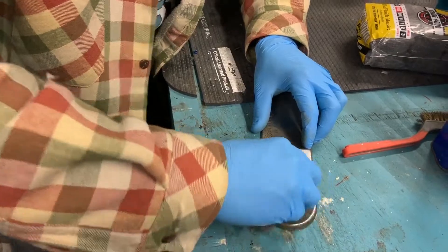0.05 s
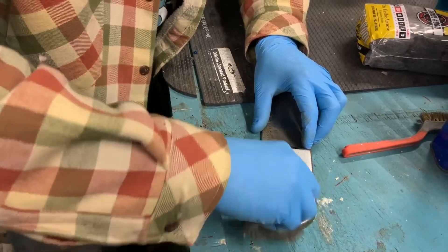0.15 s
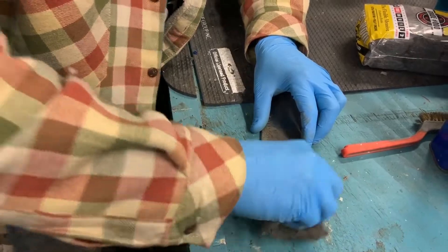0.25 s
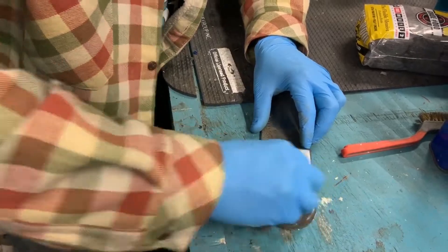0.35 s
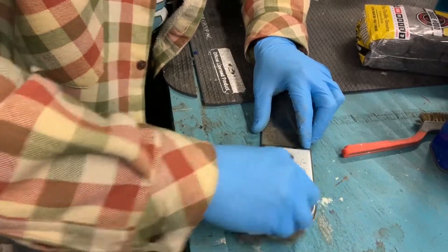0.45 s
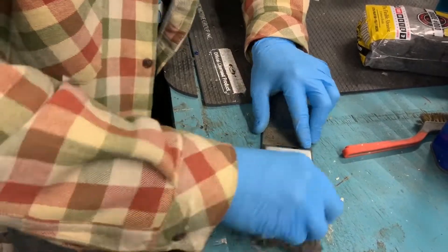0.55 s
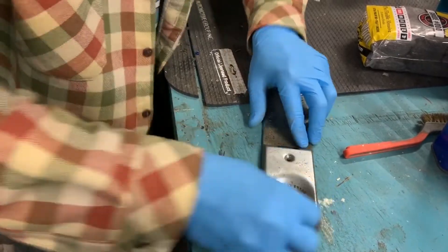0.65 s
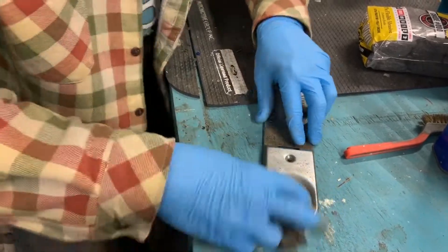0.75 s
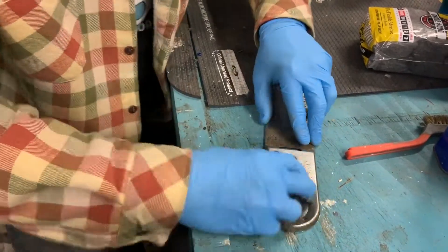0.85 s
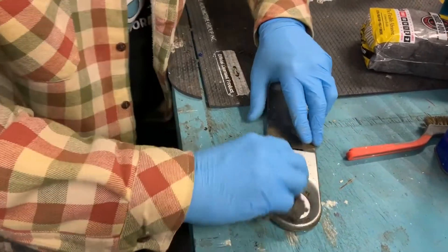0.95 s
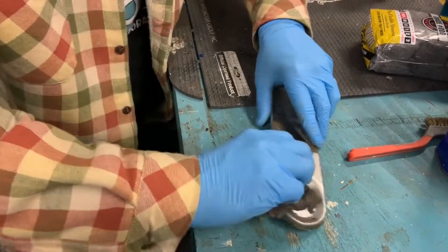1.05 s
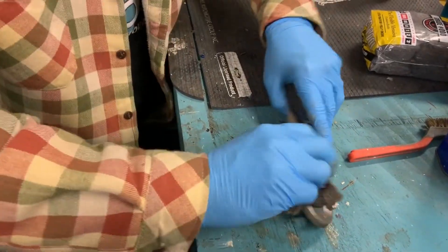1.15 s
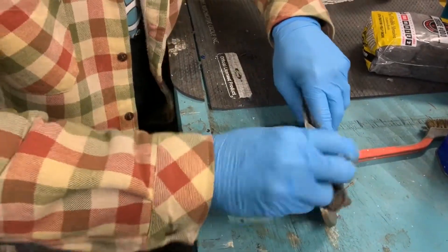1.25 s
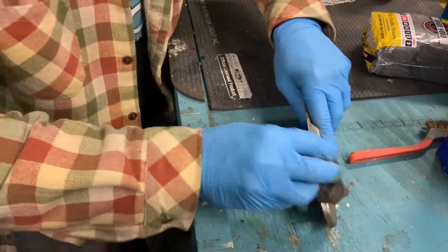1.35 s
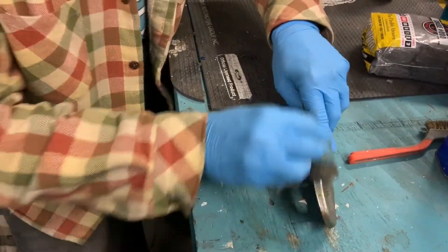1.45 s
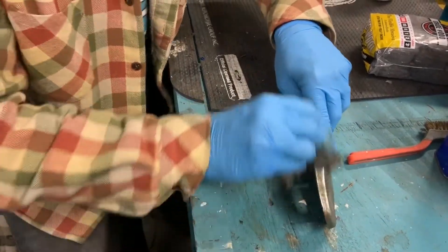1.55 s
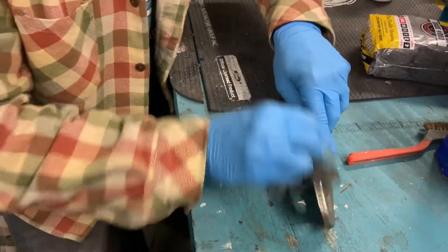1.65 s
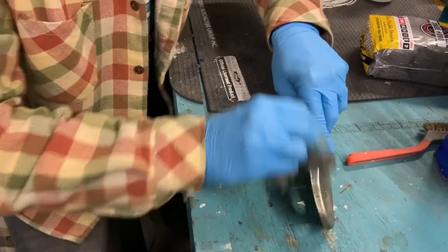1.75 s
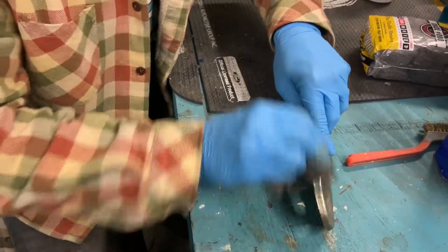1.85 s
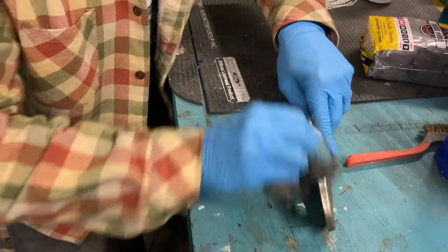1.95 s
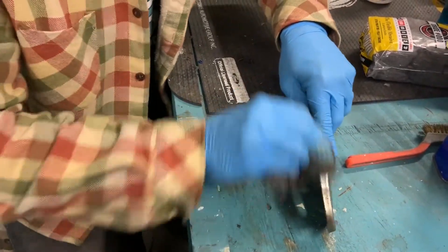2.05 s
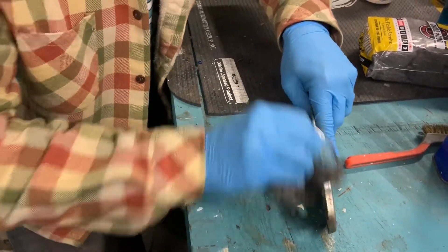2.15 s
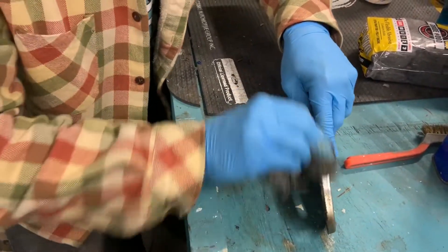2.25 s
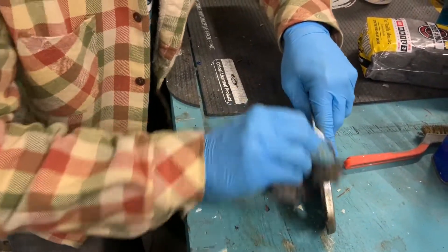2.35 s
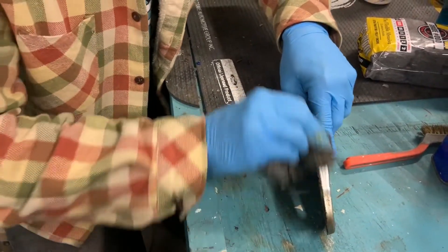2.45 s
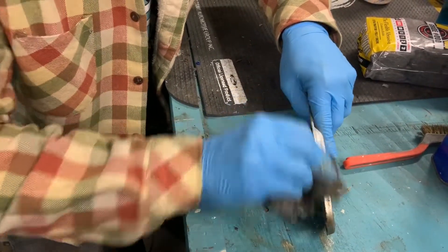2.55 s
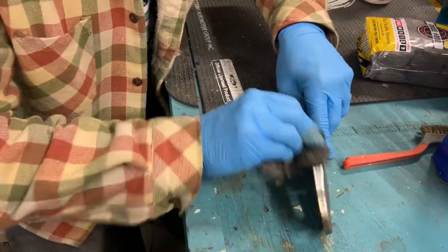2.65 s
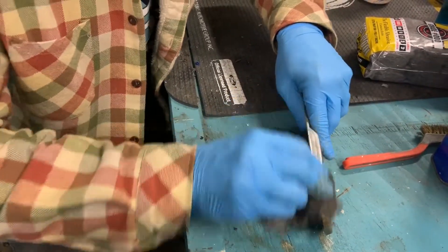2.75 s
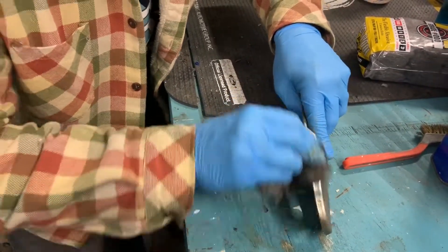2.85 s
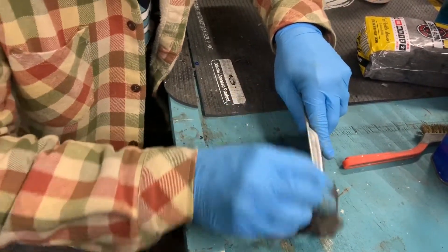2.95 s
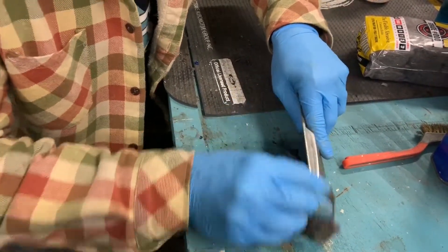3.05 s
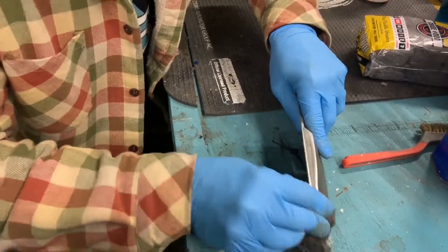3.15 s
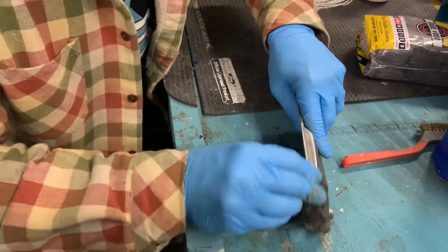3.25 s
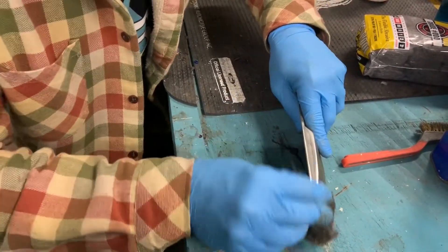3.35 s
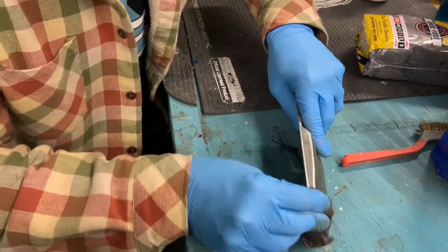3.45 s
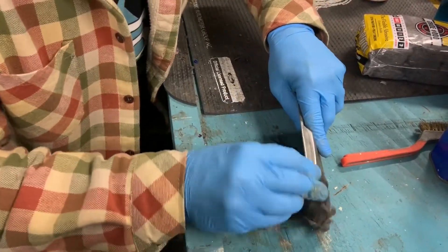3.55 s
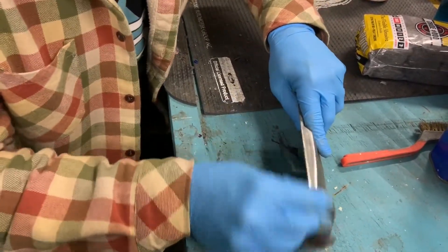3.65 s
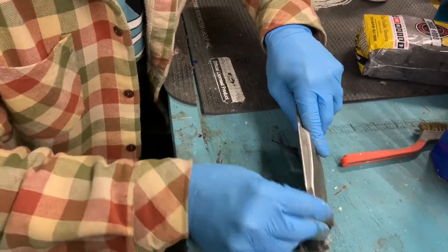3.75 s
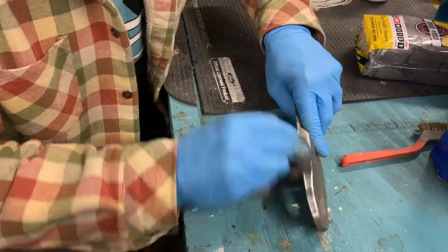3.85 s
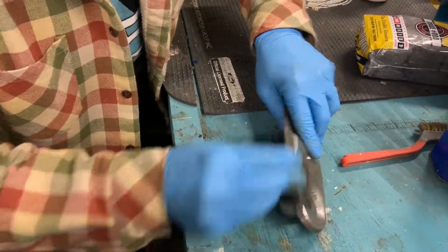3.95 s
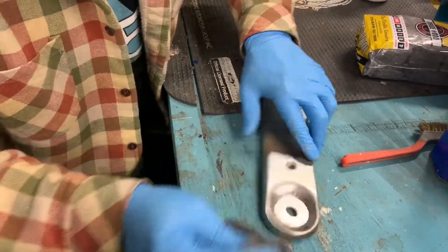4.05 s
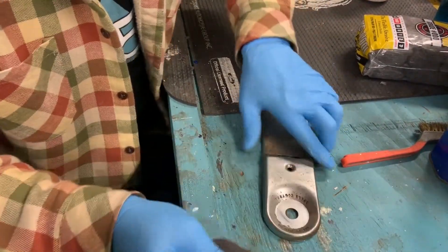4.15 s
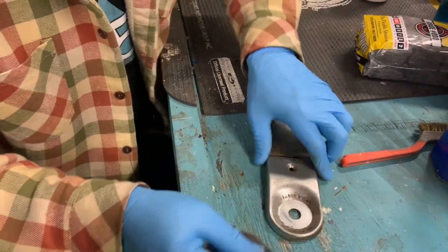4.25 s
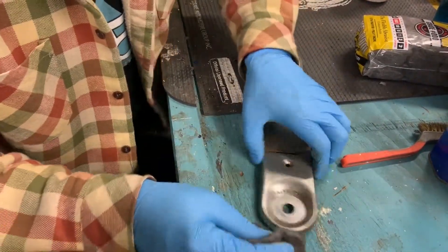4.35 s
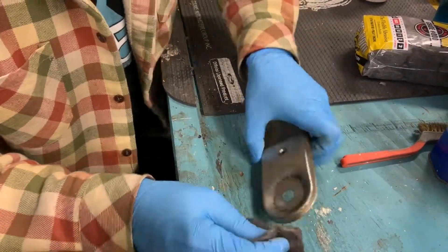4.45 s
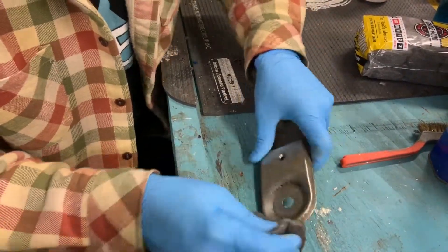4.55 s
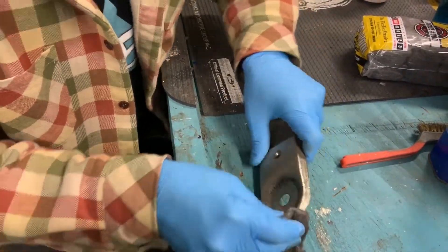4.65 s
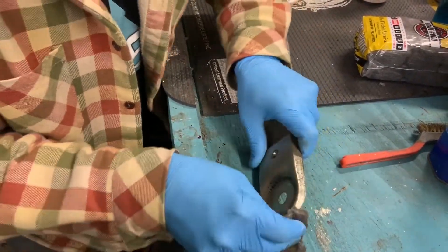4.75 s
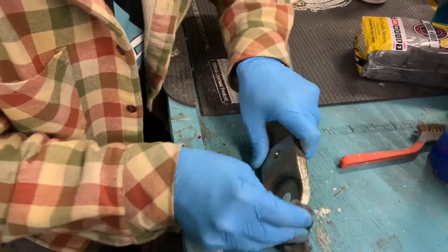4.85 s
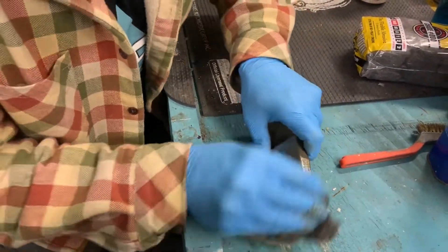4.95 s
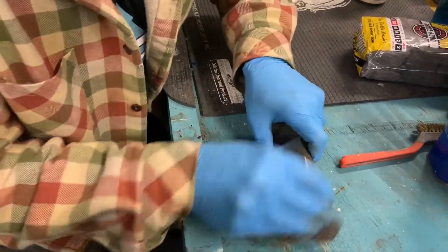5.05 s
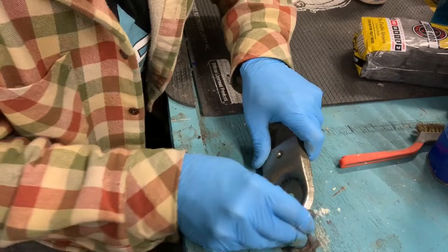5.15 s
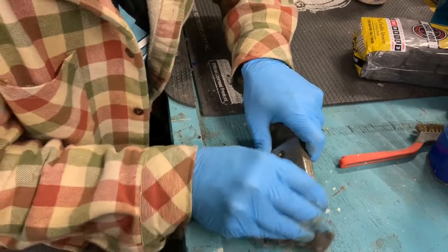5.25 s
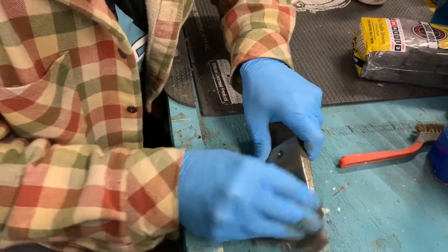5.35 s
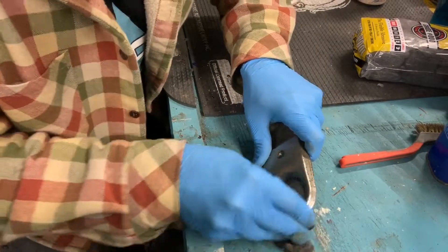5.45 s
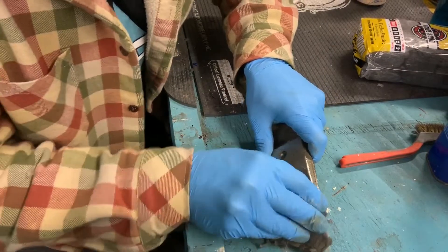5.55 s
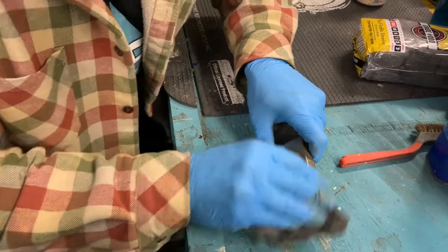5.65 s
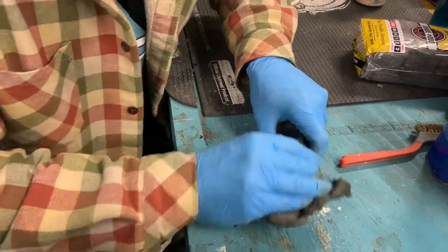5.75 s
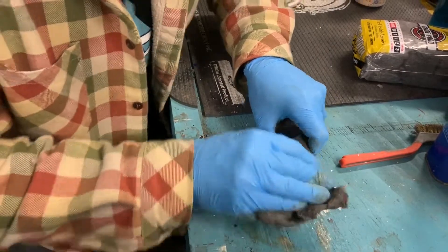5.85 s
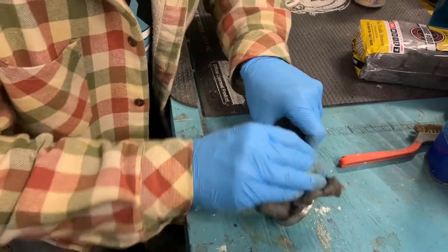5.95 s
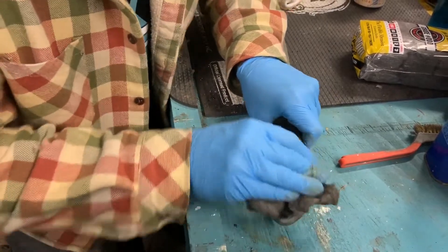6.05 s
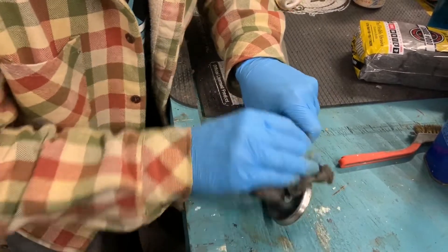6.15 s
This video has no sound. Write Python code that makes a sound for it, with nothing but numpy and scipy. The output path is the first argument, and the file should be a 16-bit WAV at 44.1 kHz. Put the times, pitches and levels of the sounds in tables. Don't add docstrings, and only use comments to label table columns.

```python
import sys
import numpy as np
from scipy import signal
from scipy.fft import rfft, irfft, next_fast_len
from scipy.io import wavfile
from scipy.ndimage import uniform_filter1d, map_coordinates

SR = 44100
rng = np.random.default_rng(int(sys.argv[2]) if len(sys.argv) > 2 else 0)


def invert_db(x):
    u = np.asarray(x, float) / 20
    return 10 ** u


def log_audio(samples):
    frames = np.atleast_2d(samples).T
    limited = np.clip(frames, -1, 1)
    pcm = np.round(limited * 32767).astype(np.int16)
    wavfile.write(sys.argv[1], SR, pcm)


N = 273861
SPLIT_HZ = 7900


def unit(x):
    return x / np.sqrt(np.mean(x ** 2) + 1e-20)


def along(points, hz):
    point_hz, value = np.transpose(points)
    return np.interp(np.log(hz + 1), np.log(point_hz + 1), value)


def curves(rows, **outside):
    time_s, *columns = np.transpose(rows)
    return np.array([np.interp(np.arange(N) / SR, time_s, c, **outside) for c in columns])


def wobble(rate_hz):
    knots = rng.standard_normal(int(N * rate_hz / SR) + 4)
    return map_coordinates(knots, [np.arange(N) * rate_hz / SR])


def swell(start_s, rise_s, t60_s):
    t = np.clip(np.arange(N) / SR - start_s, 0, None)
    return (1 - np.exp(-t / rise_s)) ** 2 * invert_db(-120 * t / t60_s)


def filtered(x, response):
    m = next_fast_len(N + SR // 4)
    return irfft(rfft(x, m) * response(np.fft.rfftfreq(m, 1 / SR)), m)[..., :N]


def resonances(peaks):
    def response(f):
        total = 0
        for k, (hz, width, db) in enumerate(peaks):
            damping = 1j * f * width
            total = total + (-1) ** k * invert_db(db) * damping / (hz * hz - f * f + damping)
        return total
    return response


# pitch_hz, correlation
LIKENESS = [(300, 0.97), (900, 0.73), (1500, 0.51), (2600, 0.86), (3300, 0.2), (5400, 0.5), (6500, 0.18),
            (7600, 0.8), (8200, 1), (16000, 0.99)]


def spread(pair, response=np.ones_like):
    def mid_side(hz):
        angle = np.arccos(np.clip(along(LIKENESS, hz), -1, 1)) / 2
        return response(hz) * [np.cos(angle), np.sin(angle)]
    mid, side = filtered(pair, mid_side)
    return np.array([mid + side, mid - side])


def fibres(response, grain_db, patchy_db):
    clumps = rng.standard_normal((2, N)) * invert_db(grain_db * wobble(500))
    z = signal.stft(clumps, nperseg=512)[2]
    patches = uniform_filter1d(rng.standard_normal(z.shape[1:]), size=3, axis=0)
    patches = uniform_filter1d(patches, size=6, axis=1)
    pair = signal.istft(z * invert_db(patchy_db * unit(patches)), nperseg=512)[1][:, :N]
    return unit(spread(pair, response))


# pitch_hz, level_db
FLOOR_HUM = [(12, -37), (22, -6), (40, -1.5), (58, -4), (75, -26.5)]
FRAME_HUM = [(45, -27.5), (62, -7), (86, 0.5), (135, -11.5), (200, -11.5), (300, -33)]
CALM_LEVELS = [-58.5, -62]
# peak_s, floor_db, frame_db
ARM_JOLTS = [(.23, -53, -72), (.79, -52, -46), (1.0, -38.5, -42), (1.18, -53.5, -43.5), (1.5, -60, -58),
             (2.2, -53, -68), (2.55, -44, -51), (3.1, -63, -47), (3.3, -67, -63), (3.6, -36.5, -37.5),
             (4.1, -47.5, -32.5), (4.4, -37, -39), (4.55, -44, -38.5), (4.78, -42, -49), (5.15, -51, -65),
             (5.92, -52, -52)]


def shaking():
    wander_db, rise_s, t60_s = 4, 0.026, 1
    out = 0
    for k, body in enumerate([FLOOR_HUM, FRAME_HUM]):
        power = invert_db(1.938 * (CALM_LEVELS[k] + wander_db * wobble(6)))
        for peak_s, *level_db in ARM_JOLTS:
            power = power + invert_db(2 * level_db[k]) * swell(peak_s - rise_s, rise_s, t60_s)
        hum = fibres(lambda f: invert_db(along(body, f)), grain_db=-0.7, patchy_db=1)
        out = out + np.sqrt(power) * hum
    return out


def pressed(fizz_db, press_db, scratch_db, bench_db):
    scratch_growth, bench_growth = 0.45, 1
    over_fizz_db = [0 * press_db, scratch_db + scratch_growth * press_db,
                    press_db, bench_db + bench_growth * press_db]
    return fizz_db + np.array(over_fizz_db)


# time_s, fizz_db, pressure_db
PAD_AT_REST = [(0.0, -41, -5), (0.33, -40, -22), (0.52, -46, -8), (1.02, -47.5, -9.5), (1.2, -44, -19.5),
               (1.49, -43.5, -14.5), (1.61, -45, -13), (2.11, -42.5, -14), (2.25, -45, -14),
               (2.73, -42, -11), (2.87, -44, -10), (3.54, -47, -11), (3.68, -48.5, -4.5),
               (3.99, -41.5, -11.5), (4.26, -45, -6.5), (4.91, -44, -10), (5.98, -47, -10),
               (6.21, -50, -11)]
# start_s, length_s, fizz_db (speed), pressure_db (plate over fizz), bite_db (wires on chrome, if any)
QUICK_STROKES = [(1.399, 0.075, -28, -15, 0.5), (1.508, 0.071, -28.5, -26.5, 1),
                 (1.605, 0.065, -25.5, -40, 1.5), (1.699, 0.077, -29, -60, 3),
                 (1.808, .061, -27.5, -28.5, 1), (1.893, 0.085, -29.5, -32.5, 1.5),
                 (1.992, 0.068, -26, -27, 3), (2.089, 0.085, -27, -32.5, 2.5),
                 (2.195, 0.063, -25, -32.5, 2), (2.287, 0.075, -28.5, -34, 2.5),
                 (2.395, 0.055, -24.5, -45, 2.5), (2.481, 0.07, -26.5, -32.5, 1),
                 (2.575, 0.063, -27, -22.5, 1.5), (2.658, 0.087, -29, -18.5, 1),
                 (2.784, 0.051, -28, -22, 0), (2.867, 0.087, -29.5, -22.5, 1)]
LIGHT_STROKES = [(0.01, 0.1064, -44, 7), (-0.1, 0.13, -44, -12, 7), (0.144, 0.09, -42.5, -2.5),
                 (0.262, 0.21, -41.5, -3.5), (0.43, 0.03, -47, 4), (0.56, 0.06, -46, -2.5),
                 (0.7, 0.067, -46, -3.5), (1.4, 0.0748, -46, 1.5, 5), (4, 0.0174, -45.5, 15, -2),
                 (1.168, -0.2, -41, -21)]
SLOW_STROKES = [(3.021, 0.054, -33.5, -11.5, 0.32), (3.134, 0.054, -38.5, -5, 0),
                (3.194, 0.052, -39, -6.5, 0), (3.286, 0.071, -35, -10, 0), (3.453, 0.085, -37.5, -10.5, 0),
                (3.582, 0.091, -32.5, -1.5, 1), (3.736, 0.12, -32, -13, 2.4), (3.741, 0.048, -44, 9, 0),
                (4.777, 0.056, -46, 2, 0), (4.875, 0.098, -35.5, -3, 0), (5.011, 0.06, -34.5, -10, 0.16),
                (5.156, 0.089, -40, -13.5, 0), (5.322, 0.06, -34.5, -13.5, 0), (5.44, 0.087, -42, -8.5, 0),
                (5.58, .11, -37, -7, 0), (5.715, 0.062, -40.5, -11.5, 0), (5.847, 0.053, -36, -9, 0.35),
                (5.937, 0.053, -38.5, -6, 0.48), (6.044, 0.063, -34, -17.5, 0),
                (6.142, 0.067, -33, -17.5, 0)]
PACE_CHANGES = [
    1.38,
    2.97,
    4.7,
]
# scratch_db over fizz, bench_db over fizz
GRIP_BALANCE = [
    (-7.5, -13),
    (-1.5, -4),
    (-5, 1.5),
    (-6, -7.5),
]
STROKE_RISE = [0.0032, 0.0032, 0.0048, 0.0051]
STROKE_FALL = [.005, .006, .009, .013]


def stroke_power():
    lean_db = 5.5
    rest_db = pressed(*curves(PAD_AT_REST), scratch_db=-3.5, bench_db=-4)
    wander_db = 1.5 * np.array([wobble(9) for _ in rest_db])
    power, t = invert_db(2 * (rest_db + wander_db)), np.arange(N) / SR
    strokes = QUICK_STROKES + LIGHT_STROKES + SLOW_STROKES
    for turn, (start_s, length_s, fizz_db, press_db, *bite_db) in enumerate(strokes):
        k = slice(max(int((start_s - .05) * SR), 0), int((start_s + length_s + .12) * SR))
        since, left = t[k] - start_s, start_s + length_s - t[k]
        quick = turn < len(QUICK_STROKES)
        lean = invert_db((-1) ** turn * lean_db * quick * np.clip(2 * since / length_s - 1, -1, 1))
        scratch_db, bench_db = GRIP_BALANCE[np.searchsorted(PACE_CHANGES, start_s)]
        levels_db = pressed(fizz_db, press_db, scratch_db + sum(bite_db), bench_db)
        arch = 0.48 + np.clip(np.sin(np.pi * since / length_s), 0, 1)
        for layer, (db, rise_s, fall_s) in enumerate(zip(levels_db, STROKE_RISE, STROKE_FALL)):
            speed = 1 / (1 + np.exp(-since / rise_s)) / (1 + np.exp(-left / fall_s))
            power[layer, k] += invert_db(2 * db) * speed ** 2.36 * arch * lean
    return power


# pitch_hz, level_db
FIZZ_SPECTRUM = [(7600, -29.5), (7900, -12), (8050, -2.5), (15600, -0.5), (15800, 1), (16100, -71.5)]
# pitch_hz, width_hz, level_db
WOOL_RESONANCES = [(8214, 153, -0.5), (10300, 7500, -11.5), (12830, 760, -12), (13350, 260, -7.5),
                   (15030, 780, -8.5)]


def wool_fizz():
    def body(f):
        return invert_db(along(FIZZ_SPECTRUM, f)) * (abs(resonances(WOOL_RESONANCES)(f)) + 0.37)
    return fibres(body, grain_db=1, patchy_db=3.5)


GRIP_CHANGES = [
    1.38,
    4.7,
]
# pitch_hz, level_db
SCRATCH_SPECTRUM = [(1900, -4), (2400, 1.5), (3200, 1.5), (4800, -1), (6500, -3), (7700, 0.5),
                    (8100, -11.5)]
# pitch_hz, width_hz, level_db
CHROME_RESONANCES = [(3130, 42, -10), (3750, 17, -5), (4730, 50, -11.5), (5056, 22, -1.5), (5620, 50, 0.5),
                     (6660, 140, -6), (7520, 61, -4)]
# pitch_hz, level_db
FLAT_TONE = [(2200, 3), (4600, 3), (5500, -0.5), (7500, -4.5)]


def chrome_scratch():
    def body(f):
        return invert_db(along(SCRATCH_SPECTRUM, f)) * (abs(resonances(CHROME_RESONANCES)(f)) + .28)
    scratch = fibres(body, grain_db=2.4, patchy_db=3.2)
    duller = filtered(scratch, lambda f: invert_db(along(FLAT_TONE, f)))
    return np.where(np.arange(N) / SR < GRIP_CHANGES[0], duller, scratch)


def gripped(bodies, top_hz, grain_db, patchy_db):
    grip = np.searchsorted(GRIP_CHANGES, np.arange(N) / SR)
    rings = []
    for peaks in bodies:
        body = lambda f: abs(resonances(peaks)(f)) / (1 + (f / top_hz) ** 8)
        rings.append(fibres(body, grain_db, patchy_db))
    return np.choose(grip, rings)


# pitch_hz, width_hz, level_db
PLATE_GRIPS = [
    [(1050, 140, -4.5), (1322, 106, 4), (1580, 290, 1.5), (1950, 270, 1), (2300, 270, -1)],
    [(1118, 69, 0.5), (1320, 45, 1.5), (1550, 300, -7.5), (1935, 200, -7.5)],
    [(1116, 77, -7), (1323, 77, -1.5), (1650, 250, -8.5), (1898, 75, 3.5), (2100, 210, -3)],
]
# pitch_hz, width_hz, level_db
BENCH_GRIPS = [
    [(267, 72, -3.5), (490, 140, -2), (590, 44, 0), (680, 63, 1.5), (900, 60, -3)],
    [(235, 45, -8), (335, 60, 2), (520, 80, -12), (684, 38, -1), (818, 35, -3)],
    [(229, 30, -2.5), (332, 78, -3), (480, 72, -5.5), (692, 105, -5.5)],
]


def rubbing():
    plate = gripped(PLATE_GRIPS, top_hz=2300, grain_db=2.6, patchy_db=2.2)
    bench = gripped(BENCH_GRIPS, top_hz=1100, grain_db=1.2, patchy_db=2.2)
    layers = [wool_fizz(), chrome_scratch(), plate, bench]
    flutter = invert_db(0.87 * wobble(60))
    return flutter * sum(np.sqrt(p) * layer for p, layer in zip(stroke_power(), layers))


def short_rings(table, rise_s, t60_s):
    out, t = np.zeros(N + SR), np.arange(SR // 8) / SR
    for start_s, peak_db, hz in table:
        fade = invert_db(peak_db + 1.5 - 60 * t / t60_s)
        out[round(start_s * SR):][:len(t)] += fade * (1 - np.exp(-t / rise_s)) * np.sin(2 * np.pi * hz * t)
    return out[:N]


# start_s, peak_db, pitch_hz
JUDDER_CATCHES = [(0.0044, -21, 1520), (0.0118, -22, 1510), (0.0238, -22, 1510), (0.031, -22, 1600),
                  (0.035, -24, 1500), (0.0404, -23, 1600), (0.0483, -19, 1370), (0.069, -24.5, 1480),
                  (0.0754, -27, 1500), (0.0857, -30, 1350), (0.147, -39.5, 1720), (0.1718, -35, 1650),
                  (0.2049, -32, 1680), (0.3283, -34.5, 1660), (0.3366, -27, 1370), (0.3571, -36, 1410),
                  (0.393, -40.5, 1440), (0.4145, -38, 1390), (0.504, -35, 1370)]


def judder():
    return short_rings(JUDDER_CATCHES, rise_s=.0006, t60_s=0.02)


# time_s, pitch_hz, level_db
GLOVE_SQUEAKS = [
    [(.08, 310, -68), (.15, 345.4, -59), (.22, 376, -49.5), (.29, 345, -58.5), (.36, 335, -52)],
    [(.68, 326, -61), (.72, 330, -51), (.76, 320, -66)],
    [(.72, 590, -66.5), (.8, 568, -61), (.87, 622, -61), (.97, 561, -58), (1.08, 576, -57)],
]


def glove():
    out = np.zeros(N)
    for rows in GLOVE_SQUEAKS:
        hz = curves(rows)[0]
        level_db = curves(rows, left=-120, right=-120)[1]
        out += invert_db(level_db + 3.8 * wobble(25)) * np.sin(2 * np.pi * np.cumsum(hz) / SR)
    return out


# pitch_hz, width_hz, level_db
KNOCK_RESONANCES = [(302, 64, -7.5), (565, 67, -10.5), (695, 60, -3), (877, 50, -4.5), (1108, 84, 0),
                    (1303, 130, 0.5), (1600, 140, -2.5), (1916, 170, -6.5)]


def contacts(table, modes, frame, crack_s, dulled_db):
    settle_s = 4.129
    steel, snap, push, shove = np.zeros((4, N + SR))
    t = np.arange(SR // 3) / SR
    hz, mode_db, *t60_s = np.transpose(modes)[:, :, None]
    for start_s, ring_db, crack_db, knock_db, thump_db in table:
        here = slice(round(start_s * SR), round(start_s * SR) + len(t))
        loose = np.minimum(t, max(settle_s - start_s, 0))
        fade_db = 60 * (loose / t60_s[0] + (t - loose) / t60_s[-1])
        drift = np.cumsum(.012 * rng.standard_normal((len(modes), len(t))), axis=1)
        tone = np.sin(2 * np.pi * (hz * t + rng.random(hz.shape)) + drift)
        ring = (invert_db(mode_db - fade_db) * tone).sum(axis=0)
        steel[here] += invert_db(ring_db) * ring * (1 - np.exp(-t / 0.00019))
        burst = invert_db(crack_db - 60 * t / crack_s) * rng.standard_normal(len(t))
        snap[here] += burst * (1 - np.exp(-t / 0.00078))
        push[here] += invert_db(knock_db + 31.0) * t / 0.00033 * np.exp(-t / .0001)
        shove[here.start] = invert_db(thump_db + 49.0)
    crack = filtered(snap[:N], lambda f: invert_db(dulled_db * (f < SPLIT_HZ)))
    knock = filtered(push[:N], resonances(KNOCK_RESONANCES))
    thump = filtered(shove[:N], lambda f: resonances(frame)(f) / (1 + 1j * f / 400) ** 2)
    return steel[:N] + crack + knock + thump


# start_s, ring_db, crack_db, knock_db, thump_db
BENCH_KNOCKS = [
    (.79, -80, -58, -53, -40.5),
    (1.035, -69, -55, -27, -36.5),
    (4.4958, -33, -25, -3, -26.5),
    (4.503, -28.5, -46, -12.5, -42),
    (4.513, -34, -43, -30, -26),
    (4.531, -59, -55, -24, -30),
    (4.556, -60, -55, -29, -38),
    (4.624, -56, -58, -34, -27.5),
    (4.633, -70, -60, -40, -32),
]
# pitch_hz, level_db, t60_s
RIM_MODES = [(3100, -6.5, 0.082), (4670, -14, 0.19), (6750, -8, .05), (8180, 4, 0.087), (8800, -3, 0.081),
             (10830, -19, 0.12)]
# pitch_hz, width_hz, level_db
FRAME_THUMP = [(82.3, 6.3, -3), (249, 77, -1.5)]


def knocks():
    return contacts(BENCH_KNOCKS, RIM_MODES, FRAME_THUMP, crack_s=0.13, dulled_db=-2.5)


# start_s, ring_db, crack_db, knock_db, thump_db
PLATE_FALL = [
    (4.0382, -21.5, -7.5, -4.5, -17),
]
# pitch_hz, level_db, loose_t60_s, rest_t60_s
FLAT_MODES = [(1303, 0, 1.2, .3), (2327, -9, 1.5, .4), (2912, -11, 1.5, .2), (3042, -16, 3, .8),
              (3616, -13, 2, .25), (3693, -8, 3, .15), (3717, -8, 3, .15), (4484, -14, 2, .15),
              (4856, -17, .8, .4), (5066, -14, 1.5, .1), (5459, -16, 1, .15), (5674, -12, 2, .15),
              (6627, -16, .4, .3), (7650, -24, 1, .15), (8242, -6, .17, .3), (8441, 3, .14, .3),
              (8872, 1, .15, .3), (9500, -2, .1, .1), (11600, -4, .1, .1), (13700, -2, .1, .1)]


def fall():
    return contacts(PLATE_FALL, FLAT_MODES, FRAME_THUMP, crack_s=0.035, dulled_db=-4.0)


# peak_s, pitch_hz, half_length_s, level_db
AIR_SLAP = (4.0397, 1645, 0.00083, 5.5)


def slap():
    peak_s, hz, half_s, level_db = AIR_SLAP
    t = np.arange(N) / SR - peak_s
    skirt = np.where(t < 0, 0.04 * np.exp(-np.abs(t) / 0.0042), 0.12 * np.exp(-np.abs(t) / 0.004))
    return invert_db(level_db) * (np.exp(-(t / half_s) ** 2) + skirt) * np.cos(2 * np.pi * hz * t)


# pitch_hz, width_hz, level_db
RATTLE_RESONANCES = [(232, 21, -11), (306, 33, -7), (384, 72, -11), (560, 60, -15.5), (672, 40, -13),
                     (806, 23, -9), (1110, 140, -11), (1290, 39.4, -9), (1626, 60, -13), (1770, 40, -12),
                     (2370, 43, -1.5), (2896, 86, -14.5), (2960, 20, -17), (4506, 40, -15.5),
                     (4740, 58, -19), (5100, 46, -22), (5270, 150, -23), (5400, 40, -12.5)]


def rocking():
    start_s, swing_s, rise_s = 4.04, .058, 0.002
    swings = 0
    for k in range(3):
        swings = swings + invert_db(2 * (-10.5 - 5 * k)) * swell(start_s + swing_s * k, rise_s, 0.083 * 1.77 ** k)
    chatter = invert_db(2 * -23) * swell(start_s, rise_s, t60_s=0.76)
    rattle = resonances(RATTLE_RESONANCES)
    low = fibres(lambda f: (rattle(f) + 0.15) / (1 + (f / 2500) ** 8), grain_db=2.5, patchy_db=4.0)
    high = fibres(lambda f: (rattle(f) + 0.01) * (f > 2500) * (f < 7900), grain_db=5.5, patchy_db=-4.5)
    upper_power = invert_db(2 * -11) * swings + invert_db(2 * -9.5) * chatter
    return np.sqrt(swings + chatter) * low + np.sqrt(upper_power) * high


# start_s, ring_db, crack_db, knock_db, thump_db
ROCK_BOUNCES = [
    (4.096, -15, -38, -18, -24),
    (4.103, -60, -42, -19, -34),
    (4.111, -60, -42, -21, -26),
    (4.124, -60, -42, -22, -30),
    (4.13, -60, -42, -23, -32),
    (4.156, -45, -40, -20, -36),
]
# pitch_hz, level_db, loose_t60_s, rest_t60_s
TILTED_MODES = [(1650, -12, .5, .35), (1876, 1.5, 3, .28), (3042, -19, 2, 1.1), (3616, -22, .5, .2),
                (3700, -22, .5, .15)]


def bounce():
    return contacts(ROCK_BOUNCES, TILTED_MODES, FRAME_THUMP, crack_s=.03, dulled_db=-4.0)


# start_s, ring_db, crack_db, knock_db, thump_db
EDGE_TICKS = [
    (4.3908, -17, -22, -45, -41),
    (4.412, -80, -68.5, -60, -24.5),
]
# pitch_hz, level_db, t60_s
EDGE_MODES = [(2500, -10, 0.087), (3020, -13, 0.17), (3680, -17, 0.05), (4810, -6.5, 0.066),
              (4500, -22, 0.034), (5470, -7, .05), (6670, -19, .05), (7150, -11, 0.068), (8840, 1, 0.04),
              (11200, -4, .04), (12900, 3, 0.047), (14130, -2, .04)]
# pitch_hz, width_hz, level_db
FRAME_SWAY = [(80, 24, -2)]


def tick():
    return contacts(EDGE_TICKS, EDGE_MODES, FRAME_SWAY, crack_s=0.13, dulled_db=-14.0)


# start_s, peak_db, pitch_hz
RIM_TOUCHES = [
    (4.9, -41, 1880),
    (4.398, -46, 1150),
]


def rim_touches():
    return short_rings(RIM_TOUCHES, rise_s=.004, t60_s=0.099)


# pitch_hz, t60_s
SHOP_DECAY = [(200, 0.42), (1500, 0.2), (8000, 0.02)]


def shop(x):
    hz, t, z = signal.stft(rng.standard_normal((2, SR // 2)), SR, nperseg=256)
    fade = invert_db(-60 * t / along(SHOP_DECAY, hz)[:, None])
    tail = signal.istft(z * fade, SR, nperseg=256)[1]
    delayed = np.pad(x, (150, 0))[None]
    return spread(signal.fftconvolve(delayed, tail / np.linalg.norm(tail[0]), axes=1)[:, :N])


def scene():
    wet = [(judder(), -12), (knocks(), -14), (fall(), -9), (slap(), -15),
           (bounce(), -9), (tick(), -10), (rim_touches(), -12)]
    blows = sum(blow for blow, _ in wet)
    room = shop(sum(invert_db(wet_db) * blow for blow, wet_db in wet))
    return blows + room + rocking() + rubbing() + glove() + shaking()


# start_s, length_s, depth_db
NOISE_CLAMPS = [(0.248, 0.16, 5.5), (0.848, 0.16, 4.5), (1.243, 0.1, 5), (1.678, 0.13, 3),
                (2.064, 0.042, 12), (2.367, 0.13, 5.5), (3.238, 0.065, 8.5), (3.379, 0.1, 5.5),
                (5.07, 0.25, 9.5), (5.41, 0.11, 5.5), (5.717, 0.11, 1.5)]


def ducked(x):
    edge_s, bass_share, bass_hz = 0.023, 0.57, 2200
    t = np.arange(N) / SR
    edge = lambda u: .5 + .5 * np.tanh(u / edge_s)
    cut_db = sum(depth_db * edge(t - start_s) * edge(start_s + length_s - t)
                 for start_s, length_s, depth_db in NOISE_CLAMPS)
    bass = filtered(x, lambda f: 1 / (1 + (f / bass_hz) ** 8))
    under = filtered(x, lambda f: f < SPLIT_HZ)
    return x - under + invert_db(-cut_db) * (under - bass) + invert_db(-bass_share * cut_db) * bass


# pitch_hz, lag_rad
PORT_LAG = [(0, 0), (1500, .2), (2200, 1.6), (2600, 3.14), (3300, 6), (4800, 6.3), (5400, 9.4),
            (6000, 12.2), (7800, 12.57), (9750, 15.71), (13500, 21.99), (15500, 25.13), (22050, 25.13)]


def two_ports(x):
    top_hz = 15800
    def response(f):
        lag = np.exp(np.outer([-.5j, .5j], np.interp(f, *np.transpose(PORT_LAG))))
        return lag / (1 + (f / top_hz) ** 200)
    return filtered(x, response)


def roll_off(x):
    return signal.sosfilt(signal.butter(12, 16420, fs=SR, output="sos"), x)


def record(dry):
    ports = two_ports(ducked(dry))
    clipped = ports / (1 + np.abs(ports) ** 12) ** (1 / 12)
    return roll_off(clipped)


dry = scene()
out = record(dry)
log_audio(out)
```